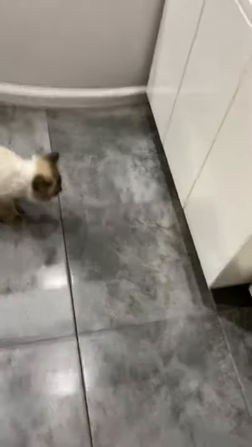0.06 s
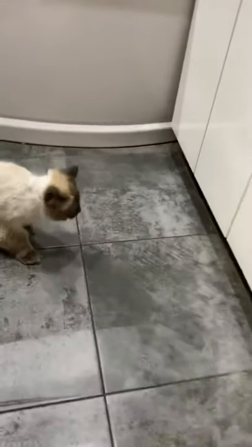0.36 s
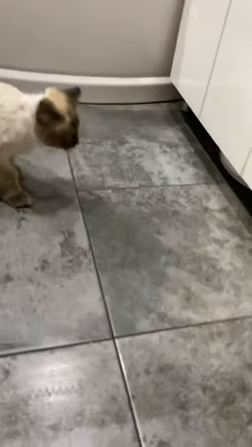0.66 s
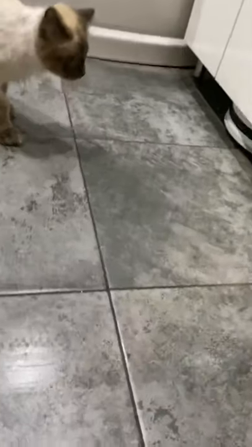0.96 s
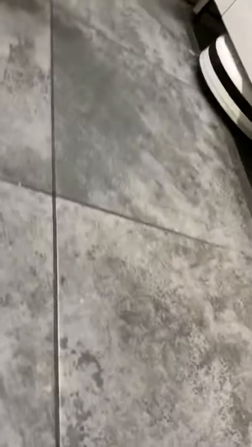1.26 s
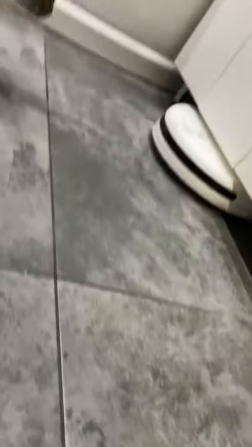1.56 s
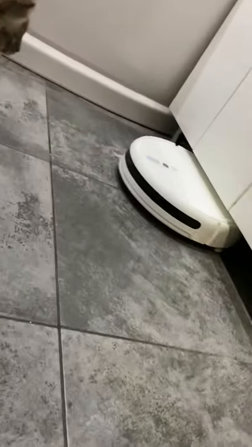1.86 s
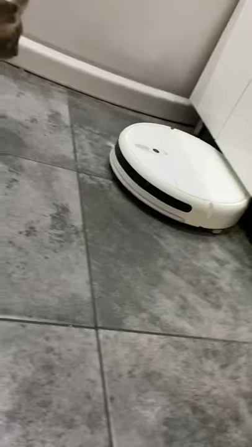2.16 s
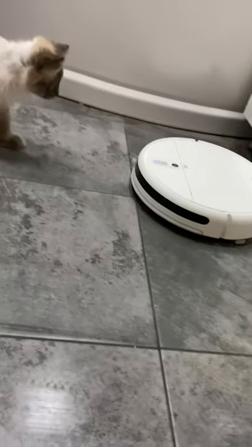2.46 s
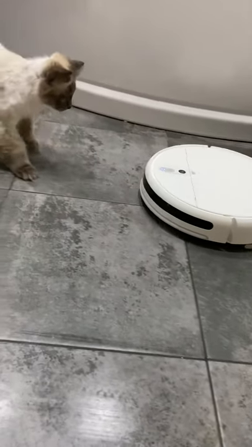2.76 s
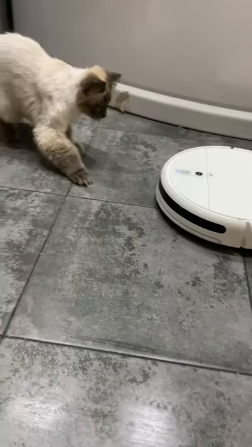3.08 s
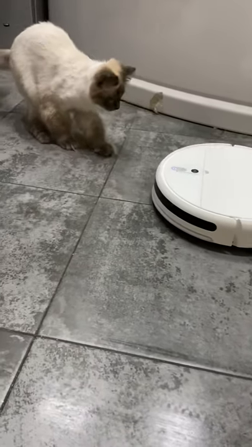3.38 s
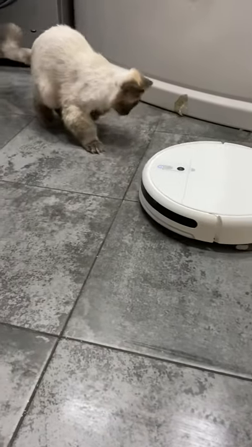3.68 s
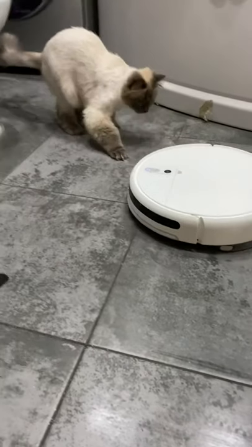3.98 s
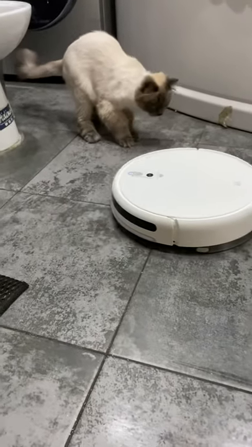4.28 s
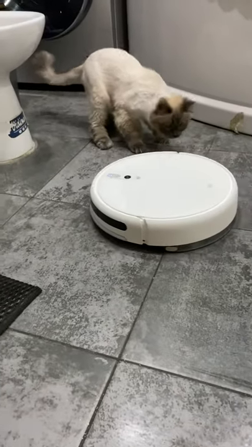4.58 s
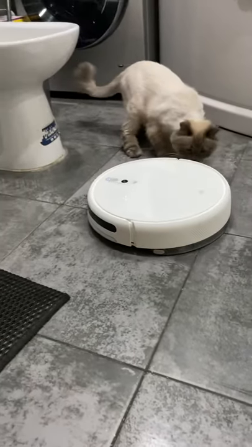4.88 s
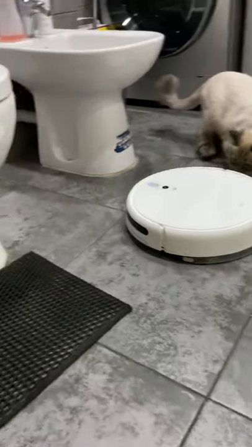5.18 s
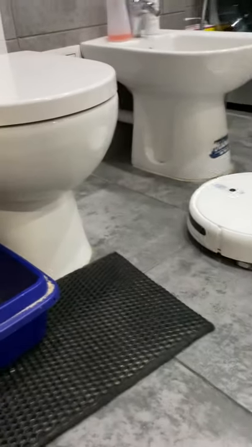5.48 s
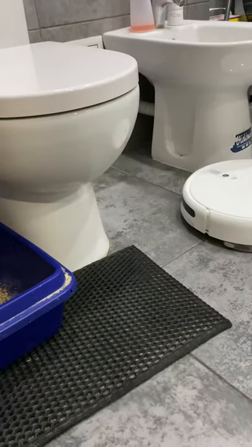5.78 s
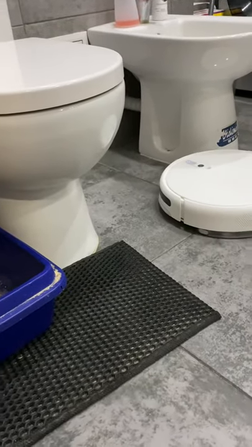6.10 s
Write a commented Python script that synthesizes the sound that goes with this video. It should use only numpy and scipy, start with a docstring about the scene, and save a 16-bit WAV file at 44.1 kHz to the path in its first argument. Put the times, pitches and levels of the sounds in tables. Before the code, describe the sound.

Steady hum and brushing of a robot vacuum on tiles, with a cluster of knocks, a sharp bumper snap and scattered plastic clacks.

```python
"""A robot vacuum crawls out from under a cabinet and across a small tiled bathroom.
Its roller brush drums and sweeps the floor, the fan hums and blows through a vent, and the wheel
gears whine as it steers. It knocks on the cabinet panel, its sprung bumper snaps back, and jolts
clack the loose plastic parts. The tiled walls reflect it all, over a low hum in the room."""
import sys
import numpy as np
from scipy import signal
from scipy.fft import rfft, irfft
from scipy.io import wavfile
from scipy.ndimage import uniform_filter1d

SR = 44100
rng = np.random.default_rng(int(sys.argv[2]) if len(sys.argv) > 2 else 0)


def output_pcm(signal):
    """Save a mono or channel-first signal as 16-bit PCM at the path in sys.argv[1].

    Samples are clipped to [-1, 1] before scaling.
    """
    pcm = np.clip(np.atleast_2d(signal).T, -1, 1) * 32767
    wavfile.write(sys.argv[1], SR, np.round(pcm).astype(np.int16))


N = 275184
T = np.arange(N) / SR
FREQS = np.maximum(np.arange(N // 2 + 1) * SR / N, 1)
HIT_T = T[:SR // 2]
HIT_FREQS = np.maximum(np.fft.rfftfreq(len(HIT_T), 1 / SR), 1)
LEFT_RIGHT = np.array([[1], [-1]])

# plastic shell spectrum: f/Hz, level/dB
SHELL_SPECTRUM = [(120, -32), (300, -15), (550, 5.5), (800, 4.5), (1000, 2), (1500, 4), (2000, -3),
                  (2500, -2), (3500, -5), (5000, -7.5), (7000, -21), (9500, -26), (16000, -35.5)]


def undb(db):
    """Decibels to gain."""
    return 10 ** (np.asarray(db) / 20)


def unit(x):
    """Scale to rms 1."""
    return x / np.sqrt(np.mean(x ** 2))


def noise():
    """Scene-length white noise."""
    return rng.standard_normal(N)


def walk(rate_hz):
    """Smooth random drift, rms 1."""
    step = max(int(SR / rate_hz / 4), 1)
    points = rng.standard_normal(N // step + 2)
    points = uniform_filter1d(uniform_filter1d(points, size=2), size=2)
    return unit(np.interp(np.arange(N) / step, np.arange(len(points)), points))


def fade(t, t60_s):
    """Exponential decay from t = 0."""
    return (t >= 0) * np.exp(-np.log(1000) * np.maximum(t, 0) / t60_s)


def past(x, edge, reach):
    """Smooth step from 0 to 1 as x passes the edge."""
    return .5 + .5 * np.tanh((x - edge) / reach / 2)


def place(start_s, x):
    """Put a short sound on the timeline."""
    return np.pad(x, (int(start_s * SR), N))[:N]


def curves(table):
    """Table columns, interpolated over time."""
    times_s, *columns = np.transpose(table)
    return [np.interp(T, times_s, column) for column in columns]


def spectrum(points, freqs=FREQS):
    """Table values, interpolated over log frequency."""
    hz, values = np.transpose(points)
    return np.interp(np.log(freqs), np.log(hz), values)


def humps(peaks, freqs=FREQS):
    """Gain in dB of a set of resonances."""
    return sum(db / (1 + (2 * (freqs - hz) / width_hz) ** 2) for hz, width_hz, db in peaks)


def colour(x, gain_db):
    """Minimum-phase filter, via the cepstrum."""
    n = len(x)
    cepstrum = irfft(np.log(undb(gain_db)), n)
    cepstrum[1:n // 2] *= 2
    cepstrum[n // 2 + 1:] = 0
    return irfft(rfft(x) * np.exp(rfft(cepstrum)), n)


def resonate(x, peaks):
    """Steep parallel resonators; output rms 1."""
    gain = sum(undb(db) / (1 + 1j * (FREQS / hz - hz / FREQS) * hz / width_hz / 2) ** 2
               for hz, width_hz, db in peaks)
    return unit(irfft(rfft(x) * gain, N))


def band(hz, width_hz):
    """Narrow noise around a centre that may move; rms 1."""
    phase = 2 * np.pi * np.cumsum(hz) / SR
    rate_hz = width_hz / np.sqrt(2)
    return walk(rate_hz) * np.sin(phase) + walk(rate_hz) * np.cos(phase)


def turns(hz, wander):
    """Revolutions of a motor whose speed wanders."""
    return np.cumsum(hz * (1 + wander * walk(2.94))) / SR


def tones(shaft, orders, waver_db):
    """Shaft harmonics; each wavers at random, as when moving through standing waves."""
    return sum(undb(db + waver_db * walk(2.56)) * np.sqrt(2)
               * np.sin(2 * np.pi * (order * shaft + rng.random())) for order, db in orders)


def ring(hits, modes):
    """Struck decaying modes; spot and grip of each contact shift pitch, damping and brightness."""
    out = np.zeros(N)
    for start_s, peak_db, pitch, length, tilt_db_oct, push_s in hits:
        body = sum(undb(db + tilt_db_oct * np.log2(hz / modes[0][0])) * fade(HIT_T, t60_s * length)
                   * np.sin(2 * np.pi * hz * pitch * HIT_T) for hz, db, t60_s in modes)
        body *= 1 - np.exp(-HIT_T / push_s)
        out += undb(peak_db) * place(start_s, body / np.abs(body).max())
    return out


def room(x, wet_db, t60_s=0.57):
    """Direct sound plus a diffuse stereo tail from the tiled walls."""
    # reflection strength: f/Hz, level/dB
    reflections = [(40, -36), (200, -3), (500, 5), (1500, 1.5), (3000, 5.5), (5000, -0.5), (7500, -6),
                   (16000, -4)]
    # stereo width of the reflections: f/Hz, side over mid/dB
    side_over_mid = [(40, -7.5), (250, -13.5), (500, -2.5), (1400, -3), (2800, 2), (5000, 1.5), (7400, -5),
                     (8500, -41.5), (11700, -38), (13500, -2.5), (16000, -4.5)]
    tails = [noise() * fade(T - .003, t60_s) for _ in range(2)]
    mid, side = (rfft(tail / np.sqrt(np.sum(tail ** 2))) for tail in tails)
    width = undb(spectrum(side_over_mid))
    wet = undb(spectrum(reflections) + wet_db)
    walls = (mid + LEFT_RIGHT * width * side) / np.sqrt(1 + width ** 2)
    return irfft(rfft(x) * (1 + wet * walls) / np.sqrt(1 + wet ** 2), N)


def roam(x, wet_db, spots=4):
    """Moving source: reflections crossfade from one spot on the floor to the next."""
    spot = T / T[-1] * (spots - 1)
    return sum(room(x * np.sqrt(np.maximum(1 - np.abs(spot - k), 0)), wet_db) for k in range(spots))


def drumming(roller, clear_m, slap_hz=194, slap_width_hz=38, slap_db=-5.5, slap_decay_turns=0.57):
    """Roller blades beat the floor; once a turn a slap booms in the chassis, most under the cabinet."""
    # blade beat: roller order, level/dB
    blade_orders = [(6, -5), (7, -14.5)]
    # chassis shaken by the roller: roller order, level/dB
    boom_orders = [(8, -15), (9, -1.5), (10, -8), (11, -16)]
    blade_db = -38 - 11.5 * np.abs(clear_m - 0.12)
    boom_db = -37 - 13.5 * past(clear_m, edge=0.3, reach=0.11)
    bursts = noise() * np.exp(-(roller % 1) / slap_decay_turns)
    slaps = resonate(bursts, [(slap_hz, slap_width_hz, 0)])
    boom = tones(roller, boom_orders, waver_db=2) + undb(slap_db) * slaps
    return undb(blade_db) * tones(roller, blade_orders, waver_db=2) + undb(boom_db) * boom


def fan(clear_m, air_db, shaft_hz=196.33, whine_hz=14050, whine_width_hz=550, whine_db=-26):
    """Suction fan: hum, overtones, and a cluster of high orders that leaves the vent with the air."""
    # fan overtones: shaft order, level/dB
    overtones = [(4, -64), (8, -63), (10, -61), (19, -67), (37, -80)]
    shaft = turns(shaft_hz, wander=.0006)
    hum_db = -47.5 - 2.5 * np.abs(clear_m)
    hum = tones(shaft, [(1, hum_db)], waver_db=0.8)
    cluster = [(k, whine_db - 10 * np.log10(1 + (2 * (k * shaft_hz - whine_hz) / whine_width_hz) ** 2))
               for k in range(69, 76)]
    whine = undb(air_db) * tones(shaft, cluster, waver_db=2.5)
    return hum + tones(shaft, overtones, waver_db=4) + whine


def room_hum(mains_hum_hz=100, drone_hz=85.5):
    """Mains hum and a fainter, wavering tone below it."""
    mains = tones(mains_hum_hz * T, [(1, -51.5)], waver_db=1)
    return mains + tones(turns(drone_hz, wander=0.0036), [(1, -62)], waver_db=5)


def gearbox(roller, backlash_turns=.002):
    """Brush motor and gears; backlash blurs the higher tones."""
    # brush drive tones: roller order, level/dB
    gear_orders = [(3, -61), (15, -72), (18, -58.5), (20, -60.5), (24, -63), (37, -65), (45, -64),
                   (60, -66), (68, -61), (80, -62.5), (100, -64.5)]
    return tones(roller + backlash_turns * walk(25), gear_orders, waver_db=3.5)


def sweeping(roller, clear_m, hidden, throb=0.075, grain_db=3):
    """Bristles flick the tile in step with the roller and sound through the duct."""
    # bristles on tile: f/Hz, level/dB
    bristle_spectrum = [(20, -11), (38, -11.5), (58, 2), (130, 2.5), (260, 0.5), (350, 2.5), (450, 0),
                        (650, -4), (1300, -2), (1700, -4.5), (2300, -12.5), (6000, -8), (16000, -50)]
    # duct resonances: f/Hz, width/Hz, gain/dB
    duct_peaks = [(568, 90, 5), (911, 174, 8), (1260, 51, 5.5), (1530, 99, 3)]
    scrub_db = 5.5 * np.exp(-((clear_m - 0.11) / 0.093) ** 2)  # body squeezes along the cabinet
    level_db = -44 - hidden + scrub_db  # 1 dB down under the cabinet
    flicks = noise() * undb(grain_db * walk(244)) * (1 + throb * np.cos(2 * np.pi * roller))
    return undb(level_db) * unit(colour(flicks, spectrum(bristle_spectrum) + humps(duct_peaks)))


def exhaust(air_db, flutter_db=1.5, swell_db=2.5, drift=.015):
    """Turbulent air leaves the vent; the grille's resonances drift and swell."""
    # exhaust air: f/Hz, level/dB
    air_spectrum = [(100, -27), (900, -4), (1800, 1), (2200, 0), (2950, 3.5), (3500, -2.5), (4250, -5),
                    (4650, -2), (6400, -8), (7600, -2), (8700, -12), (13000, -16.5), (14300, -13),
                    (16000, -25)]
    # grille resonances: f/Hz, width/Hz, level re rush/dB
    grille_peaks = [(2433, 150, -17), (2985, 260, -17), (3840, 280, -15.5), (4650, 200, -22.5)]
    turbulence = noise() * undb(flutter_db * walk(16))
    rush = unit(colour(turbulence, spectrum(air_spectrum)))
    grille = sum(undb(db + swell_db * walk(5)) * band(hz * (1 + drift * walk(2)), width_hz)
                 for hz, width_hz, db in grille_peaks)
    return undb(air_db) * (rush + grille)


def hollows(clear_m, corner_m=1.61):
    """The whir booms in the gap under the cabinet and growls as the robot nears the corner."""
    # gap resonances: f/Hz, width/Hz, gain/dB
    gap_peaks = [(580, 94, -0.5), (620.5, 40, 2.5), (750, 39, 5)]
    # room corner resonances: f/Hz, width/Hz, gain/dB
    corner_peaks = [(318, 30, 3.5), (341.5, 23, 5.5), (371.8, 11, -0.5)]
    gap_db = -46.5 - 20.5 * np.abs(clear_m)
    corner_db = -45.5 - 11.5 * np.abs(corner_m - clear_m)
    boom = undb(gap_db) * resonate(noise(), gap_peaks)
    return boom + undb(corner_db) * resonate(noise(), corner_peaks)


def shoves():
    """Soft shoves ring the chassis."""
    # shoves: t/s, peak/dB, pitch ratio, ring length ratio, tilt/(dB/oct), push/s
    pushes = [(1.208, -24, .85, 0.65, -20, 0.0047), (1.64, -29.5, 1.3, 1.5, -10, .004),
              (2.612, -29.5, 1.0, 0.76, 6.5, 0.0059), (4.025, -33, .95, 0.84, -6, 0.0045),
              (4.53, -32.5, 1.06, 1.6, 10, 0.0036), (5.369, -26, 0.97, 1.5, 7, 0.0048)]
    # chassis modes: f/Hz, level/dB, t60/s
    chassis_modes = [(203, 3.5, 0.056), (277.4, 0.5, 0.071), (337, 4, 0.061), (435, -14, 0.083)]
    return ring(pushes, chassis_modes)


def clacks(clack_t60_s=0.035, rattle_t60_s=0.3, grain_db=5):
    """Each jolt strikes the shell's resonances; loose parts chatter on unevenly."""
    # jolts: t/s, level/dB, tilt/(dB/oct), pitch ratio, rattle re clack/dB
    jolts = [(1.212, -30, 1.5, 1.05, -11), (1.265, -27, 8, 1.1, -10), (1.305, -30, 1.5, 0.98, -14),
             (1.343, -32, -2, 1.0, -20), (1.663, -33.5, 2, 0.92, -11), (2.59, -27, -3.5, 1.06, -17),
             (2.629, -28, 5.5, 0.94, -19), (2.64, -34, 1.5, .95, -17), (2.678, -43, -2, 1.0, -18),
             (3.9633, -25, 0, 0.99, -11.5), (3.989, -34.5, 0.5, 1.0, -8), (4.014, -28.5, 1, 0.97, -9),
             (4.527, -34, 0.5, 1.0, -7), (5.363, -26, -1, 1.053, -13), (5.387, -38, 5.5, 1.0, -18),
             (5.407, -38.5, 6, 1.0, -18), (5.429, -34, -1, 0.89, -25)]
    # shell resonances: f/Hz, width/Hz, gain/dB
    shell_peaks = [(890, 200, 4.5), (1120, 90, 3), (2430, 230, 10), (3160, 230, 5.5), (4820, 490, 7.5),
                   (5400, 300, 3.5)]
    out = np.zeros(N)
    for start_s, db, tilt_db_oct, pitch, rattle_db in jolts:
        contact, uneven = rng.standard_normal((2, len(HIT_T)))
        grains = undb(grain_db * unit(uniform_filter1d(uneven, size=128)))
        force = fade(HIT_T, clack_t60_s) + undb(rattle_db) * fade(HIT_T, rattle_t60_s) * unit(grains)
        shell_db = spectrum(SHELL_SPECTRUM, HIT_FREQS) + humps(shell_peaks, HIT_FREQS / pitch)
        tilt_db = tilt_db_oct * np.log2(np.maximum(HIT_FREQS, 300))
        clack = colour(contact * force, shell_db + tilt_db)
        out += undb(db) * place(start_s, clack / np.std(clack[:SR // 100]))  # level of first 10 ms
    return out


def knocks(crunch_db=-14, crunch_t60_s=0.05, top_hz=1200, tilt_db_oct=-8):
    """The shell strikes the cabinet and rebounds; each contact crunches and rings the panel."""
    # contacts: t/s, peak/dB, pitch ratio, ring length ratio, tilt/(dB/oct), push/s
    contacts = [(1.273, -20, 1.008, 0.66, -5.5, 0.0035), (1.379, -13, 1.0, .85, -4, 0.0028),
                (1.426, -19, 1.068, .65, 1, 0.007), (1.689, -13, 1.008, 0.67, 6.5, 0.0014),
                (1.738, -17, 0.984, 0.78, 6, 0.005), (1.779, -22.5, 1.0, 0.6, 18, .003)]
    # cabinet panel modes: f/Hz, level/dB, t60/s
    panel_modes = [(580.5, 14.5, 0.049), (747, -11, 0.046), (933, 5, 0.059), (1070, 4.5, 0.04),
                   (1344, -3.5, 0.041), (1625, -15, 0.037)]
    force = sum(undb(db + crunch_db) * fade(T - start_s, crunch_t60_s) for start_s, db, *_ in contacts)
    shell_db = spectrum(SHELL_SPECTRUM) + tilt_db_oct * np.log2(np.maximum(FREQS / top_hz, 1))
    crunch = colour(noise() * force, shell_db) / np.sqrt(np.mean(undb(shell_db) ** 2))
    return ring(contacts, panel_modes) + crunch


def wheels(whine_db=-2.5, slow_stage_db=-10, rasp_db=-50, flutter_db=2.5, spin_up_s=0.058, jitter=.006):
    """Steering gears: mesh whine, a stage an octave below and tooth rasp, fluttering with the load."""
    # gear mesh, one curve per steering move: t/s, f/Hz, level/dB
    moves = [
        [(1.30, 2020, -45), (1.38, 2060, -37), (1.46, 2005, -43), (1.6, 1964, -49)],
        [(2.0, 1794, -53), (2.2, 1843, -45), (2.4, 1900, -48), (2.54, 1893, -42), (2.66, 1882, -43)],
        [(2.82, 1982, -51), (3.0, 2005, -53), (3.5, 1984, -53), (3.75, 1950, -46)],
        [(4.22, 1902, -48), (4.35, 1924, -50), (4.47, 1765, -52), (4.69, 1877, -39), (4.88, 1890, -61),
         (5.29, 1900, -39), (5.35, 1822, -48)],
        [(5.52, 1965, -45), (5.622, 1955, -48), (5.68, 1973, -60)],
    ]
    mesh_hz, mesh_db = curves([point for move in moves for point in move])
    outside_s = [np.maximum(move[0][0] - T, 0) + np.maximum(T - move[-1][0], 0) for move in moves]
    running = np.exp(-np.min(outside_s, axis=0) / spin_up_s)
    mesh = np.cumsum(mesh_hz * (1 + jitter * walk(110))) / SR
    whine = np.sin(2 * np.pi * mesh) + undb(slow_stage_db) * np.sin(np.pi * mesh)
    gears = undb(mesh_db + whine_db) * whine + undb(rasp_db) * band(mesh_hz, width_hz=260)
    return gears * running * undb(flutter_db * walk(40))


def bumper(crack_t60_s=0.0085, rattle_t60_s=0.26, top_hz=6800, tilt_db_oct=-7, left_db=2):
    """The sprung bumper cracks against its stop, then trembles on, duller and more diffuse."""
    # snaps: t/s, level/dB, rattle re crack/dB
    snaps = [(1.4738, -22, -20), (1.78, -26, -16), (1.789, -20.5, -22), (1.7963, -11.8, -17.5),
             (1.7988, -17.5, -21)]
    # latch spectrum: f/Hz, level/dB
    latch_spectrum = [(500, -3), (2500, 0), (3800, .5), (4900, 4.5), (6200, 6.5), (7700, 6), (9000, 1.5),
                      (11200, 1), (13000, -7), (15300, -6), (17000, -18)]
    crack = sum(undb(db) * fade(T - start_s, crack_t60_s) for start_s, db, _ in snaps)
    rattle = sum(undb(db + rel_db) * fade(T - start_s, rattle_t60_s) for start_s, db, rel_db in snaps)
    latch_db = spectrum(latch_spectrum)
    dull_db = tilt_db_oct * np.log2(np.maximum(FREQS / top_hz, 1))
    direct = colour(noise() * crack, latch_db) * undb(LEFT_RIGHT * left_db / 2)
    diffuse = room(colour(noise() * rattle, latch_db + dull_db), wet_db=0, t60_s=.25)
    return (direct + diffuse) / np.sqrt(np.mean(undb(latch_db) ** 2))


def whistle(hz=4585, gain_db=-53.5, rise_s=4.2, fall_s=4, edge_s=.04):
    """A near-silent trace of high whistle, where the tails of two gates overlap."""
    gate = past(T, rise_s, edge_s) * (1 - past(T, fall_s, edge_s))
    return undb(gain_db) * gate * band(np.full(N, hz), width_hz=50)


def scene(roller_hz=20.48, nearest_m=0.6):
    """The robot's run and collisions; the vent is loudest nearest the microphones."""
    # path: t/s, distance clear of the cabinet front/m (negative = underneath)
    path = [(0, -0.18), (1.25, 0.021), (2.2, 0.205), (3.4, 0.5), (6.24, 1.37)]
    clear_m, = curves(path)
    hidden = 1 - past(clear_m, edge=-0.079, reach=0.05)  # 1 under the cabinet, 0 in the open
    air_db = -42 - 6 * hidden - 2.5 * np.abs(clear_m - nearest_m)
    roller = turns(roller_hz, wander=0.002)
    motors = room_hum() + drumming(roller, clear_m) + fan(clear_m, air_db) + wheels()
    whir = gearbox(roller) + sweeping(roller, clear_m, hidden) + exhaust(air_db)
    whir += hollows(clear_m) + whistle()
    bumps = room(shoves(), wet_db=-7) + room(clacks(), wet_db=-2, t60_s=.45)
    bumps += room(knocks(), wet_db=-7.5, t60_s=0.39) + bumper()
    return room(motors, wet_db=-12) + roam(whir, wet_db=-2) + bumps


def record(dry, low_cut_hz=45, top_hz=15800):
    """Two microphones, each with its own colour and phase; rumble and the very top are cut."""
    # microphone balance: f/Hz, left minus right/dB
    balance = [(60, -2.5), (170, 3), (350, 4), (550, 0.1), (900, 3), (1300, 0), (2000, 1.5), (3400, -2.5),
               (4200, -2.5), (5000, 0.5), (8000, 0)]
    # phase between the ports: f/Hz, left lead/rad
    port_phase = [(200, 0), (950, -.35), (2000, .2), (2700, 0), (3300, 1), (4000, 1.1), (4900, 2.3),
                  (5600, 1.8), (7200, 2.3), (8400, np.pi), (11800, np.pi), (13700, 4.4), (15800, 6.2)]
    gain = undb(LEFT_RIGHT * spectrum(balance) / 2)
    shift = np.exp(1j * LEFT_RIGHT * spectrum(port_phase) / 2)
    heard = irfft(rfft(dry) * gain * shift, N)
    heard = signal.sosfilt(signal.butter(2, low_cut_hz, "high", fs=SR, output="sos"), heard)
    return signal.sosfilt(signal.ellip(10, .2, 80, top_hz, fs=SR, output="sos"), heard)


dry = scene()
out = record(dry)
output_pcm(out)
```